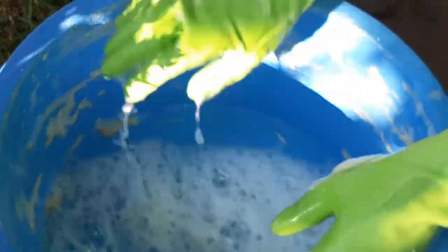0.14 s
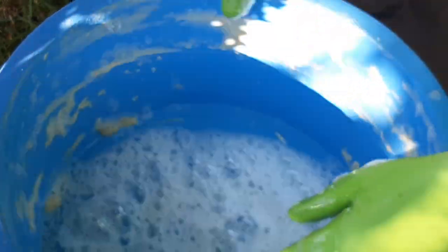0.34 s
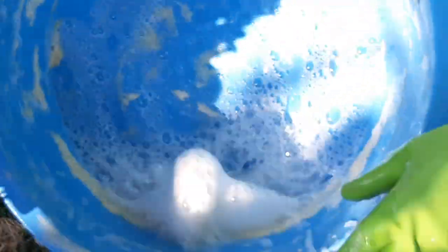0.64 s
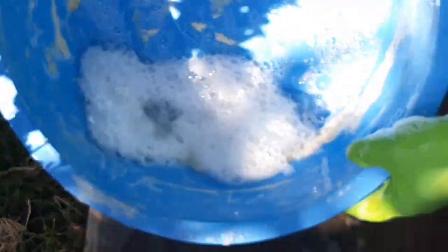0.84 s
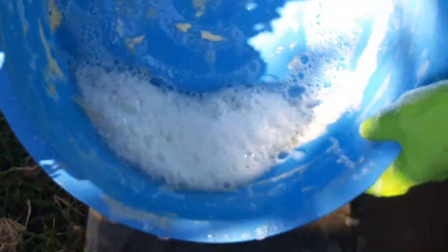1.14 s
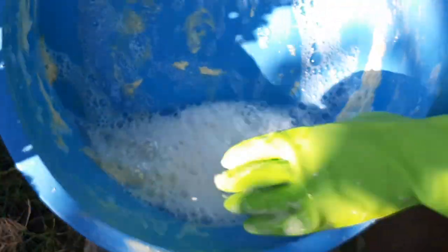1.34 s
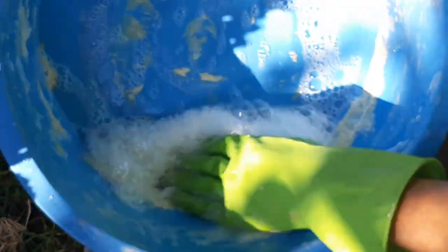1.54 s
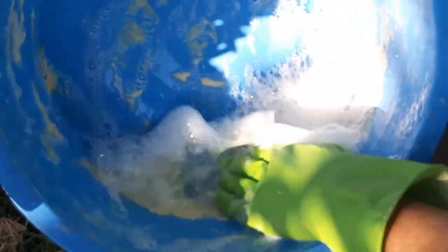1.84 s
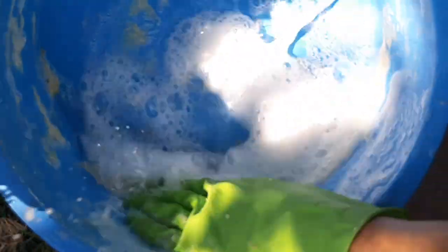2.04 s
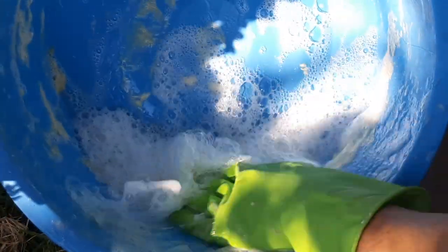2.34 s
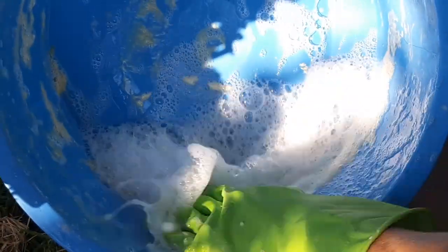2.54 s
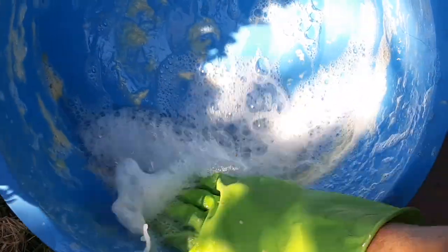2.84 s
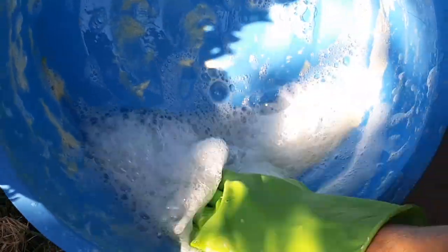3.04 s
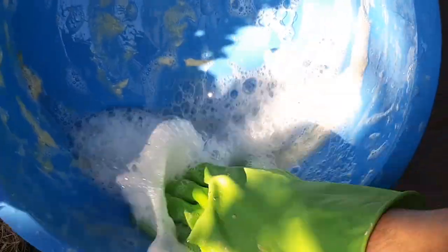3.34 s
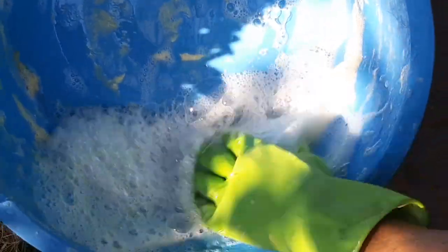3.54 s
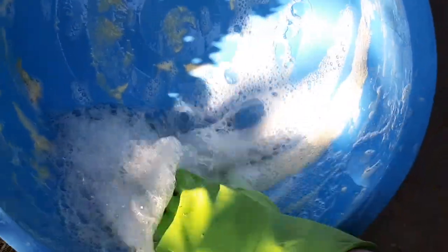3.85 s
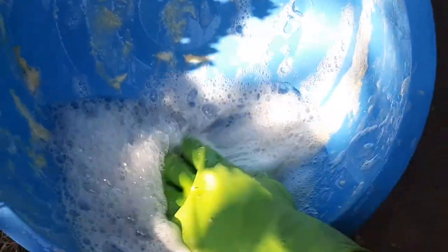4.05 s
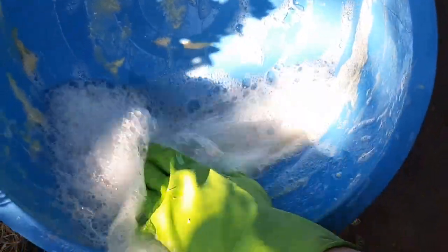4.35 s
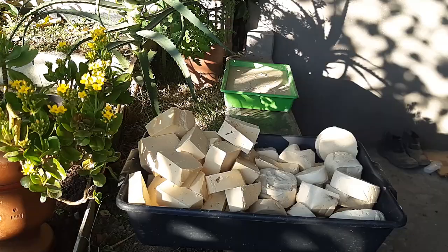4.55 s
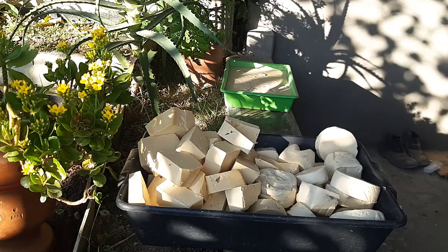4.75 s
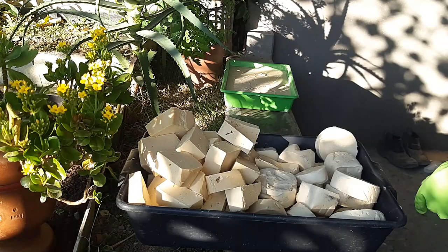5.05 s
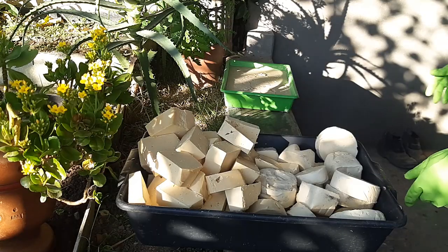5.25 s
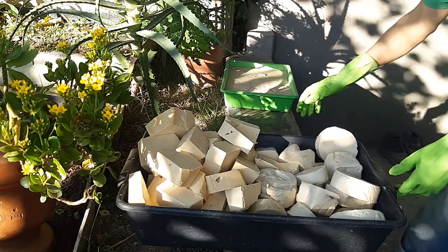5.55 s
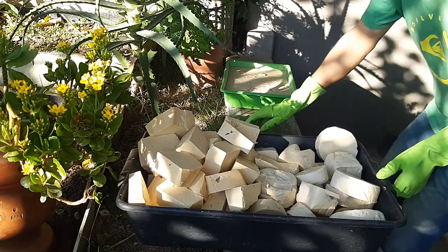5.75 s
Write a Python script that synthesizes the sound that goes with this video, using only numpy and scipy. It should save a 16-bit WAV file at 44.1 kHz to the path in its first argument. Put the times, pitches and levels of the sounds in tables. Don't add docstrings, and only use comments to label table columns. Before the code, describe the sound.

In a quiet yard with low, steady air noise, a close microphone hears soapy water in a plastic basin. A faint stir opens the scene, with small wet shifts and a click around 0.4-0.5 s. At 0.61 s the basin lands with a loud, hollow, short-ringing thud and a watery shudder; a second follows at 0.88 s. From about 1.2 to 1.45 s it drags with a low, hollow groan and slosh. From 1.55 s a glove strokes the wall unevenly: glugs, gurgles, finger knocks and wet plops, wrapped in crackly fizz and fine popping bubbles. Foam is strongest near 2 s; sharper knocks come near 3, 3.7, 3.95 and 4.33 s. At 4.65 s the perspective jumps farther away. A faint low motor hums until about 5.3 s, while soft wet rustles and scuffs peak near 4.96, 5.3 and 5.68 s, then fade into yard air.

```python
import sys
import numpy as np
from scipy import signal
from scipy.fft import rfft, irfft, next_fast_len
from scipy.io import wavfile
from scipy.ndimage import uniform_filter1d, map_coordinates

SR = 44100
rng = np.random.default_rng(int(sys.argv[2]) if len(sys.argv) > 2 else 0)


def level_to_linear(level):
    exponent = np.asarray(level, float) / 20
    return 10 ** exponent


def transcribe(signal):
    frames = np.atleast_2d(signal).T
    limited = np.clip(frames, -1, 1)
    pcm = np.round(limited * 32767).astype(np.int16)
    wavfile.write(sys.argv[1], SR, pcm)


N = 259308
TIME = np.arange(N) / SR
MOVED_S = 4.65
SCRUB_FROM_S = 1.55
STROKE_SWING_DB = 20
YARD_DB = -59
TOP_HZ = 15750

# start in seconds, blow in dB.
BUMP_CONTACTS = [
    [(.6142, -12.5), (.657, -36), (.671, -40), (.684, -34), (.75, -45.5)],
    [(.8812, -11), (.906, -36), (.930, -56), (.952, -33.5), (1.02, -56)],
]
# frequency in Hz, level in dB, t60 in seconds.
BASIN_MODES = [
    [(145, -14, 0.087), (194, -11, 0.066), (242, 3, 0.063), (358, 3, 0.11), (395, -21, 0.26),
     (557, -26, 0.16), (765, -10.5, 0.039), (855, -44, 0.08), (1028, -26, 0.14), (1200, -9, 0.022),
     (1380, -6.5, 0.027), (1610, -21, 0.029)],
    [(71.3, -17, 0.16), (198, -2, 0.094), (249, 3, 0.049), (342.5, -2, 0.083), (431, -14, 0.15),
     (754, -7.5, 0.036), (990, -22, 0.046), (1233, 3.5, 0.011), (1390, -4.5, 0.012), (1540, -21, 0.026)],
]
# frequency in Hz, density in dB per Hz.
SHAKEN_WATER = [
    [(35, -54.5), (60, -41), (175, -6.5), (361, -6), (466, -16.5), (1130, -13.5), (2270, -32),
     (4790, -31.5), (15700, -61)],
    [(35, -32), (60, -15.5), (352, -3.5), (815, -14), (1360, -19), (3150, -40), (6630, -45.5), (9400, -78),
     (15700, -42.5)],
]
# frequency in Hz, t60 in seconds.
SHAKEN_T60 = [(100, 0.42), (1000, 0.29), (4000, 0.29), (12000, 0.27)]

# peak in seconds, level in dB, swell in seconds, fade in seconds.
DRAGS = [
    (1.26, -47.5, 0.085, .08),
    (1.305, -38, 0.062, 0.1),
    (1.33, -43, 0.046, 0.053),
    (1.4, -40.5, 0.089, 0.054),
    (1.433, -44.5, 0.069, 0.1),
]
# frequency in Hz, density in dB per Hz.
GROAN = [(45, -31), (75, -2), (130, -18), (200, -8), (265, 14), (305, 10), (350, 9.5), (430, -44)]
# peak in seconds, level in dB, swell in seconds, fade in seconds.
THRUMS = [
    (.367, -55, 0.031, .05),
    (.44, -57.5, 0.055, .04),
    (.535, -58, 0.044, .15),
    (.595, -57, 0.18, .03),
]
# frequency in Hz, density in dB per Hz.
FLEX = [(70, -43), (115, -14), (143, 10), (175, -5), (260, -50.5)]

# peak in seconds, slosh in dB, scrub in dB, swell in seconds, fade in seconds.
GRIPS = [(0.03, -68, -61, 0.12, 0.078), (0.38, -64, -60, .006, 0.1), (.43, -69, -57.5, 0.087, .08),
         (0.49, -57, -48.5, 0.042, 0.056), (0.509, -59, -49.5, 0.053, 0.091), (1.205, -54, -65, .01, .1),
         (1.24, -55, -50, 0.035, 0.14), (1.271, -40.5, -41.5, 0.06, .14), (1.31, -52, -53, .03, .1),
         (1.365, -65, -52, 0.072, 0.15), (1.43, -45, -50.5, .15, 0.025)]
# peak in seconds, slosh in dB, scrub in dB, swell in seconds, fade in seconds.
STROKES = [(1.577, -53, -57.5, 0.04, 0.25), (1.764, -53, -51, 0.11, 0.16), (1.83, -60, -52, 0.018, .1),
           (1.888, -52, -51.5, 0.078, 0.041), (2, -49, -47.5, 0.036, 0.12), (2.068, -56, -60, .015, 0.052),
           (2.14, -55.5, -51, 0.1, .12), (2.274, -55.5, -55.5, 0.088, 0.21),
           (2.41, -51.5, -51.5, 0.061, 0.081), (2.49, -55.5, -59, 0.049, 0.067),
           (2.588, -57, -50.5, 0.11, 0.018), (2.646, -61.5, -54.5, .06, 0.31),
           (2.759, -42, -73, 0.074, 0.079), (2.83, -71, -54, 0.16, 0.022), (2.98, -51, -54.5, 0.19, 0.057),
           (3.025, -57, -57, 0.01, 0.1), (3.07, -56, -53, 0.055, .15), (3.2, -60, -62.5, 1, 1),
           (3.41, -63, -76, .008, 0.18), (3.61, -56.5, -58.5, 0.051, .08), (3.876, -54, -56, 0.31, 0.065),
           (3.954, -48.5, -49, 0.0023, 0.12), (4.088, -55.5, -57, 0.03, 0.1),
           (4.26, -59.5, -63.5, 0.13, 0.29), (4.514, -60, -62, 0.28, 0.12)]
# peak in seconds, slosh in dB, scrub in dB, swell in seconds, fade in seconds.
FAR_MOVES = [
    (4.974, -62.5, -57.5, 0.04, 0.077),
    (5.284, -53, -54.5, 0.012, 0.2),
    (5.686, -50.5, -53.5, 0.061, 0.14),
]
# time in seconds, pitch in Hz.
GLUG_PITCH = [(0.1, 272), (2.0, 347), (2.3, 278), (2.6, 384), (2.758, 206.5), (2.87, 364), (3.0, 283),
              (3.41, 364), (4.4, 337), (4.85, 206), (5.68, 468)]
# frequency in Hz, density in dB per Hz.
SLOSH = [(60, -40), (130, 6.5), (200, 2), (420, 0.5), (520, 0), (800, -28), (2000, -79)]
# frequency in Hz, density in dB per Hz.
SCRUB = [(400, -29.5), (520, 2.5), (880, -3), (1200, -1.5), (1850, -7.5), (2100, -17.5), (3000, -32.5),
         (5000, -83.5)]
# peak in seconds, level in dB, swell in seconds, fade in seconds.
SCUFFS = [
    (4.96, -50.5, 0.0029, 0.091),
    (5.312, -59, 0.16, 0.14),
    (5.682, -54, 0.026, .12),
]
# frequency in Hz, density in dB per Hz.
SCUFF = [(900, -37), (1500, -7.5), (2200, 1.5), (3200, 0), (4200, -20)]

# start in seconds, peak in dB,
# pitch in Hz.
KNOCKS = [(0.379, -42, 754), (1.199, -47, 730), (1.226, -32, 745), (2.402, -42, 431), (2.573, -41, 398),
          (2.879, -41, 386), (2.98, -31.5, 282), (3.021, -36.5, 640), (3.187, -36, 358), (3.415, -34, 665),
          (3.671, -40, 920), (3.696, -31.5, 697), (3.709, -33.5, 367), (3.827, -36, 410),
          (3.933, -43.5, 510), (3.954, -35, 607), (3.957, -26.5, 557), (4.075, -37.5, 845),
          (4.336, -35.5, 418), (4.956, -38.5, 654),
          (1.9905, -35, 1610), (2.062, -34.5, 1100), (2.1333, -49, 760), (2.6396, -39, 1350),
         (2.6548, -38.5, 1390), (2.6843, -43, 1490), (3.021, -38.5, 1850), (3.4124, -35.5, 1480),
         (3.8296, -50, 2000), (3.9537, -32, 990), (4.0982, -43, 1070), (4.335, -28.5, 876),
         (4.5588, -46.5, 1560),
          (1.705, -43, 740), (1.732, -39.5, 765), (1.823, -33, 1040), (1.962, -42, 1790),
           (2.109, -50, 450), (2.266, -44, 820), (2.491, -60, 590), (2.536, -41, 470), (2.763, -49, 501),
           (2.932, -46, 790), (2.948, -40, 547), (3.054, -35.5, 498), (3.115, -40, 668),
           (3.162, -39.5, 676), (3.223, -46, 570), (3.298, -41.5, 575), (3.579, -41.5, 730),
           (3.733, -43, 514), (3.785, -56, 536), (4.453, -41.5, 515), (4.515, -43, 511)]
# start in seconds, peak in dB, pitch in Hz.
BLOOPS = [(.36, -52, 143), (.686, -35, 347), (.752, -44, 353), (1.318, -46, 75), (2.325, -47, 180),
          (4.097, -50, 1104), (.486, -36, 1480), (.503, -34, 783), (1.265, -31, 592), (1.775, -44, 186),
          (1.825, -38, 1430), (1.883, -35, 1940), (1.936, -41.5, 173), (2.003, -36, 660), (2.066, -49, 725),
          (2.57, -41, 864), (2.808, -43.5, 688), (2.98, -46, 1710), (3.055, -45, 508), (3.068, -49, 1050),
          (4.556, -49, 1710), (5.682, -39.5, 455)]
# start in seconds, peak in dB, pitch in Hz.
SNAPS = [(0.3792, -54, 1200), (2.0633, -43, 1000), (2.5264, -38, 4200), (0.6147, -21, 1080),
         (1.6495, -48, 5500), (1.9912, -27.5, 1520), (2.2673, -42, 5000), (2.879, -43, 890),
         (3.0212, -45, 1290), (3.8269, -36, 2200), (3.9325, -43, 690), (4.3355, -39, 920),
         (4.558, -48.5, 1680), (5.659, -48, 1800)]

# peak in seconds, fizz in dB, spray in dB over the fizz, swell in seconds, fade in seconds.
SWAYS = [
    (0.026, -62, -12, 0.68, 0.073),
    (0.376, -73.5, -4, 0.099, 1),
    (0.505, -54, -17, 0.031, 0.12),
    (1.28, -64.5, -26, 0.056, 0.34),
    (1.36, -62, -13, 0.23, 0.1),
    (1.42, -67, -16, .1, .04),
]
# peak in seconds, fizz in dB, spray in dB over the fizz, swell in seconds, fade in seconds.
SQUEEZES = [(1.57, -65, -4.5, 0.011, 1), (1.738, -53.5, -12, 0.096, 0.092), (1.87, -49.5, -7.5, 0.27, 0.17),
            (1.93, -65, -12, 0.056, 0.29), (1.96, -48, -1.5, 0.13, .1), (1.989, -43.5, -4.5, 0.077, 0.074),
            (2.158, -52, -11.5, 0.19, 0.088), (2.225, -66, -15, .01, 0.043), (2.27, -51, -11, 0.03, 0.035),
            (2.298, -57, -5.5, 0.035, 0.037), (2.48, -61.5, -12, 0.39, 0.16),
            (2.548, -54.5, -0.5, 0.062, 0.091), (2.643, -55, -15, 0.018, 0.24),
            (2.773, -57.5, -9, 0.32, 0.073), (2.95, -60, -12.5, 0.087, 0.1),
            (3.038, -56, -9.5, 0.036, 0.072), (3.148, -58, -7, 0.035, 0.15), (3.382, -55.5, -7, 0.13, 0.1),
            (3.46, -49, -1.5, 0.017, 0.12), (3.57, -54.5, -7.5, 0.04, 0.091),
            (3.712, -58, -15, 0.017, 0.18), (3.824, -48, -18, 0.011, 0.048), (4.104, -66, -14, 0.45, 0.074),
            (4.216, -67, -21, 0.026, 0.45), (4.329, -56, -12, 0.0076, 0.07), (4.5, -66, -10, 0.058, 0.24)]
# peak in seconds, fizz in dB, spray in dB over the fizz, swell in seconds, fade in seconds.
RUSTLES = [
    (4.77, -61, -2, 0.094, 0.32),
    (4.961, -52.5, 3, 0.0069, 0.1),
    (5.17, -58, -5, 0.00428, 0.16),
    (5.294, -55, -5.5, 0.16, 0.27),
    (5.472, -56.5, -7, 0.069, 0.078),
    (5.664, -58, -10, 0.029, 0.3),
    (5.804, -69.5, 8, 0.11, 0.15),
]
# frequency in Hz, density in dB per Hz.
FIZZ = [(1060, -9), (1800, -1), (2350, -6), (2790, -5.5), (4470, -3.5), (5080, -3), (5900, -5), (6700, 0.5),
        (7600, -36), (9880, -71), (16700, -120)]
# frequency in Hz, density in dB per Hz.
RUSTLE = [(1200, -60), (2300, -30), (3000, -14), (3600, -4), (4900, 0), (6700, -3), (7600, -18),
          (10000, -45)]
# frequency in Hz, density in dB per Hz.
SPRAY = [(6000, -38), (7000, -4), (7600, -13.5), (9050, -9.5), (13100, -14), (14300, -16), (15200, -4),
         (15700, -10)]
# start in seconds, peak in dB, pitch in Hz, left-right in dB.
POPS = [(0.3797, -59, 6360, 9), (1.616, -48.5, 4160, 2), (1.6503, -37.5, 6100, 6),
        (1.7143, -39.5, 6640, 6.5), (1.73, -34.5, 15300, 8.5), (1.832, -35, 6570, 12),
        (1.9904, -38, 2880, -1), (2.0655, -41.5, 2190, 4), (2.268, -31.5, 6140, 8), (2.526, -39.5, 4700, 6),
        (2.755, -42, 6560, 4), (3.0224, -60, 4800, 32), (3.129, -48, 6460, 7), (3.375, -43, 6650, 3.0),
        (3.449, -50, 6200, 8), (3.5662, -47, 3880, 2), (3.713, -38, 4070, 10), (3.824, -37, 6400, 4),
        (4.3282, -50, 3630, 17), (4.9568, -44.5, 3160, -8), (5.456, -34.5, 5000, 3.5),
        (5.6577, -48.5, 6360, 3),
        (1.5648, -58, 6100, 6.5), (1.594, -52, 4740, 4.5), (1.9317, -39, 4900, -10),
         (1.988, -44, 2890, 2.0), (2.225, -50, 3050, 5.5), (2.4503, -50, 4600, 1), (2.4738, -48, 3870, 3.5),
         (2.494, -49.5, 6100, 5.0), (2.6354, -54, 4110, 3.5), (2.6828, -44, 2620, 3.0),
         (2.7798, -48.5, 2220, 3.0), (2.9043, -58, 4400, 6.0), (2.9342, -62, 3950, 5.5),
         (3.2016, -54, 4070, 9), (3.2879, -53, 5730, 4.5), (3.3447, -54, 2780, 6), (3.5316, -49, 6400, 3.0),
         (3.7434, -54, 3110, 0), (3.786, -54, 1980, 4.5), (3.816, -46, 2020, -2), (4.0783, -55, 3170, 16),
         (4.2123, -61, 4190, 6.0), (4.4633, -54, 4030, 4.5), (4.514, -53, 4070, 9),
        (0.6135, -52, 4200, 5), (.624, -44, 5600, 5), (0.632, -37, 5400, 6), (.641, -51, 2900, 4),
         (.657, -57, 3460, 6), (0.8816, -48, 6440, 9.5), (.893, -59, 14500, 7), (1.573, -63, 15300, 14),
         (1.678, -48, 15300, 9), (1.895, -34.5, 15300, 11), (1.932, -33.5, 8900, 1),
         (1.99, -35, 12100, 2.5), (2.248, -48, 4000, 2), (2.253, -52, 6670, 6), (2.2674, -40, 2570, 4),
         (2.5445, -42, 9800, 9), (3.46, -45, 15300, 2), (3.5327, -48, 10600, 1), (3.5726, -39, 15300, 7),
         (4.5584, -54, 14700, 4), (4.9572, -40, 15200, -6), (4.958, -46, 9500, -7)]

# frequency in Hz, t60 in seconds.
WALLS_T60 = [(200, 0.1), (2000, 0.18), (10000, 0.042)]
# time in seconds, rotation in Hz, level in dB.
MOTOR = [
    (4.64, 93.8, -86),
    (4.668, 92.7, -62),
    (4.806, 92.4, -60),
    (5.23, 92.7, -62.5),
    (5.3, 94, -79),
]
# multiple of the rotation, level in dB.
MOTOR_ORDERS = [(1, 8.5), (2, -12), (3, -10), (7.2, -8), (9.1, -11.5)]
# frequency in Hz, density in dB per Hz.
YARD = [(15, -67), (25, -68), (55, -7.5), (107, -4.5), (140, -6), (283, -10.5), (315, -15.5), (351, -8.5),
        (512, -11.5), (602, -11.5), (901, -19), (1770, -39), (15700, -42)]
# frequency in Hz, change in dB.
FARTHER = [(100, 2), (250, -2), (450, -3.5), (1000, -2), (2500, 3.5), (8000, -3.5)]
# frequency in Hz, left-right likeness from 0 to 1.
ALIKE = [(60, 1), (500, 0.79), (1200, 0.27), (2500, 0.2), (6000, 0.035), (12000, 0.053)]
# frequency in Hz, left-right in dB.
PORT_TILT = [(60, 0.5), (180, 1.5), (550, 3.5), (1650, 3.5), (4970, 3.5), (9000, 1), (15000, 3.5)]


def bumps():
    ring, shake, t = np.zeros(N), np.zeros((2, N)), np.arange(SR // 2) / SR
    for contacts, modes, water, water_db in zip(BUMP_CONTACTS, BASIN_MODES, SHAKEN_WATER, (-50, -52)):
        for k, (s, blow_db) in enumerate(contacts):
            scatter_db = rng.normal(0, 1.5, size=len(modes)) * (k > 0)
            blow = np.zeros(len(t))
            for (hz, db, t60_s), jog_db in zip(modes, scatter_db):
                blow += level_to_linear(db + jog_db - 60 * t / t60_s) * np.sin(2 * np.pi * hz * t)
            add(ring, s, level_to_linear(blow_db) * blow * (1 - np.exp(-t / 0.0022)))
        first_s = contacts[0][0]
        tail = np.zeros((2, N))
        add(tail, first_s, dying(SHAKEN_T60, seconds=0.38))
        onset = np.clip((TIME - first_s) / 0.00025, 0, 1)
        shake += level_to_linear(water_db) * spread(tail, shaped(water)) * onset
    return signal.sosfilt(signal.butter(4, 68, "high", fs=SR, output="sos"), ring) + shake


def drag():
    groan = spread(rng.standard_normal((2, N)), shaped(GROAN))
    thrum = spread(rng.standard_normal((2, N)), shaped(FLEX))
    groan_db = strokes(*np.transpose(DRAGS))
    thrum_db = strokes(*np.transpose(THRUMS))
    return level_to_linear(groan_db) * groan + level_to_linear(thrum_db) * thrum


def wall():
    s, slosh_db, scrub_db, swell_s, fade_s = np.transpose(GRIPS + STROKES + FAR_MOVES)
    slosh_db = strokes(s, slosh_db, swell_s, fade_s)
    scrub_db = strokes(s, scrub_db, swell_s, fade_s)
    glug_hz, = curves(GLUG_PITCH)
    glugs = bubbles(count=1500, centre_hz=glug_hz, scatter=0.16, cycles=28,
                    spread_db=0.0, share=0.05, patchy_db=-4.0)
    slosh = level_to_linear(slosh_db) * spread(glugs, shaped(SLOSH))
    gurgle = bubbles(count=4000, centre_hz=np.full(N, 1150), scatter=0.674, cycles=22,
                     spread_db=2.5, share=0.077, patchy_db=1.5)
    roughness = np.where((TIME > SCRUB_FROM_S) & (TIME < MOVED_S), 1, 0.3)
    scrub_db = scrub_db + 1.45 * wobble(70) * roughness
    return slosh + level_to_linear(scrub_db) * spread(gurgle, shaped(SCRUB))


def scuffs():
    db = strokes(*np.transpose(SCUFFS))
    return level_to_linear(db) * spread(patchy(depth_db=3.2), shaped(SCUFF))


def knocks():
    track, t = np.zeros(N), np.arange(SR // 10) / SR
    for s, db, hz in KNOCKS:
        ratio = rng.uniform(1.43, 1.45)
        partner_hz = hz * ratio if hz < 1200 else hz / ratio
        note = np.sin(2 * np.pi * hz * t) + 0.5 * np.sin(2 * np.pi * partner_hz * t)
        band = signal.butter(2, [hz / 1.31, hz * 1.235], "band", fs=SR, output="sos")
        splash = unit(signal.sosfilt(band, rng.standard_normal(len(t))))
        puff = 0.42 * splash * level_to_linear(-60 * t / 0.05)
        attack = 1 - np.exp(-t / 0.00066)
        add(track, s, level_to_linear(db - 4.0) * (level_to_linear(-60 * t * hz / 11) * note + puff) * attack)
    return np.array([track, track])


def bloops():
    track, t = np.zeros(N), np.arange(SR // 8) / SR
    for s, db, hz in BLOOPS:
        turns = hz * t
        t60_s = 0.017 + 14 / hz
        note = np.sin(2 * np.pi * turns * (1 + 0.0035 * turns))
        add(track, s, level_to_linear(db + 1 - 60 * t / t60_s) * note * (1 - np.exp(-t / 0.0022)))
    return np.array([track, track])


def snaps():
    track, t = np.zeros(N), np.arange(SR // 100) / SR
    for s, db, hz in SNAPS:
        add(track, s, level_to_linear(db + 2.5 - 60 * t * hz / 5.8) * np.sin(2 * np.pi * hz * t))
    return np.array([track, track])


def foam():
    s, db, over_db, swell_s, fade_s = np.transpose(SWAYS + SQUEEZES + RUSTLES)
    fizz_db = strokes(s, db, swell_s, fade_s)
    spray_over_db = strokes(s, db + over_db, swell_s, fade_s) - fizz_db
    near = TIME < MOVED_S
    clumps_db = (2.1 * wobble(60) + 1.68 * wobble(200)) * np.where(near, 1, 0.4)
    bursts = bubbles(count=5000, centre_hz=np.full(N, 4100), scatter=0.5, cycles=3,
                     spread_db=3.5, share=0.12, patchy_db=1.2)
    near_fizz = spread(bursts, shaped(FIZZ))
    far_rustle = spread(patchy(depth_db=1.5), shaped(RUSTLE))
    fizz = np.where(near, near_fizz, far_rustle)
    spray = level_to_linear(spray_over_db) * spread(patchy(depth_db=2.0), shaped(SPRAY))
    return level_to_linear(fizz_db + clumps_db) * (fizz + spray)


def pops():
    track, t = np.zeros((2, N)), np.arange(SR // 25) / SR
    for s, db, hz, pan_db in POPS:
        bubble = np.sin(2 * np.pi * hz * t) * level_to_linear(-60 * t * hz / 30) * (1 - np.exp(-t * hz / 0.32))
        band_hz = np.clip([hz / 1.58, hz * 1.16], 100, SR / 2.2)
        band = signal.butter(3, band_hz, "band", fs=SR, output="sos")
        noise = unit(signal.sosfilt(band, rng.standard_normal((2, len(t)))))
        hiss = noise * (0.37 * level_to_linear(-60 * t / 0.0045) + 0.081 * level_to_linear(-60 * t / 0.12))
        pan = level_to_linear([[pan_db / 2 - 4.0], [-1.0 - pan_db / 2]])
        add(track, s, level_to_linear(db + 4.0) * (bubble + hiss) * pan)
    return track


def echo(x):
    tail = dying(WALLS_T60, seconds=0.36)
    late = np.pad(x, ((0, 0), (300, 0)))
    return signal.fftconvolve(late, tail / np.linalg.norm(tail[0]), axes=1)[:, :N]


def motor():
    hz, db = curves(MOTOR)
    turn = 2 * np.pi * np.cumsum(hz) / SR
    hum = np.zeros(N)
    for k, order_db in MOTOR_ORDERS:
        flutter_db = (1.3 + 1.4 * (k > 1)) * wobble(24)
        hum += level_to_linear(order_db + flutter_db) * np.sin(k * (turn + 0.078 * wobble(5.4)))
    gate = (TIME > MOTOR[0][0]) * np.clip((MOTOR[-1][0] - TIME) / 0.05, 0, 1)
    return hum * level_to_linear(db - 2.0) * gate


def yard():
    air = level_to_linear(YARD_DB + 0.79 * wobble(0.66)) * spread(rng.standard_normal((2, N)), shaped(YARD))
    return np.where(TIME < MOVED_S, air, filtered(air, shaped(FARTHER)))


def bubbles(count, centre_hz, scatter, cycles, spread_db, share, patchy_db):
    when, jog, size, side = rng.random((count, 4)).T
    start = (when * N).astype(int)
    hz = np.clip(centre_hz[start] * np.exp(scatter * (2 * jog - 1)), 60, SR / 2.5)
    gain = level_to_linear(spread_db * np.minimum(-np.log(size), 3))
    n = np.arange(min(1500000 // count, int(14 * SR / np.median(hz))))
    turns = hz[:, None] * n / SR
    envelope = level_to_linear(-60 * turns / cycles) * (1 - np.exp(-turns / 0.5))
    rising = turns * (1 + 0.023 * turns)
    notes = gain[:, None] * np.sin(2 * np.pi * rising) * envelope
    at = start[:, None] + n + (side[:, None] > 0.5) * 2 * N
    streams = np.bincount(at.ravel(), notes.ravel(), 4 * N).reshape(2, -1)[:, :N]
    return np.sqrt(share) * unit(streams) + np.sqrt(1 - share) * patchy(patchy_db)


def patchy(depth_db):
    z = signal.stft(rng.standard_normal((2, N)), nperseg=512)[2]
    field = uniform_filter1d(rng.standard_normal(z.shape[1:]), size=25, axis=0)
    field = uniform_filter1d(field, size=4, axis=1)
    return unit(signal.istft(z * level_to_linear(depth_db * unit(field)), nperseg=512)[1][:, :N])


def strokes(s, db, swell_s, fade_s):
    coarse = TIME[::64]
    late = coarse - np.c_[s]
    away = np.maximum(-late / np.c_[swell_s], late / np.c_[fade_s])
    power = (level_to_linear(np.c_[db] - STROKE_SWING_DB * away) ** 2).sum(axis=0)
    return np.interp(TIME, coarse, 10 * np.log10(power + 1e-14))


def dying(t60s, seconds):
    hz, t, z = signal.stft(rng.standard_normal((2, int(seconds * SR))), SR, nperseg=256)
    decay = level_to_linear(-60 * t / along(t60s, hz)[:, None])
    return signal.istft(z * decay, SR, nperseg=256)[1]


def spread(pair, gain):
    def turn(hz):
        return np.arccos(np.clip(along(ALIKE, hz), -1, 1)) / 2
    mid, side = filtered(pair, lambda hz: gain(hz) * [np.cos(turn(hz)), np.sin(turn(hz))])
    return unit(np.array([mid + side, mid - side]))


def shaped(spectrum):
    return lambda hz: level_to_linear(along(spectrum, hz))


def filtered(x, response):
    m = next_fast_len(N + 8192)
    return irfft(rfft(x, m) * response(np.fft.rfftfreq(m, 1 / SR)), m)[..., :N]


def along(points, hz):
    f, v = np.transpose(points)
    return np.interp(np.log(hz + 1), np.log(f + 1), v)


def curves(rows):
    s, *cols = np.transpose(rows)
    return [np.interp(TIME, s, c) for c in cols]


def wobble(rate_hz):
    knots = rng.standard_normal(int(N * rate_hz / SR) + 4)
    return map_coordinates(knots, [TIME * rate_hz])


def unit(x):
    return x / np.sqrt(np.mean(x ** 2) + 1e-20)


def add(track, s, sound):
    part = track[..., round(s * SR):][..., :sound.shape[-1]]
    part += sound[..., :part.shape[-1]]


def scene():
    taps = pops() + knocks() + bloops() + snaps()
    basin = bumps() + drag() + wall() + scuffs()
    return basin + foam() + taps + level_to_linear(-8) * echo(taps) + motor() + yard()


def top_cut(x):
    return signal.sosfilt(signal.butter(12, 17000, fs=SR, output="sos"), x)


def record(dry):
    mix = filtered(dry, lambda hz: level_to_linear(along(PORT_TILT, hz) * [[0.5], [-0.5]]) * (hz < TOP_HZ))
    return top_cut(mix)


dry = scene()
out = record(dry)
transcribe(out)
```